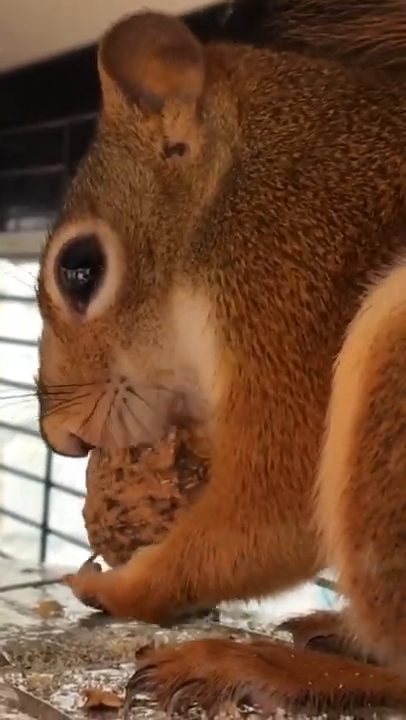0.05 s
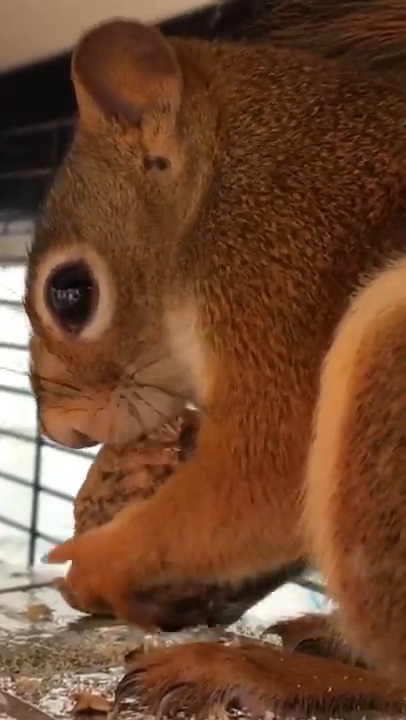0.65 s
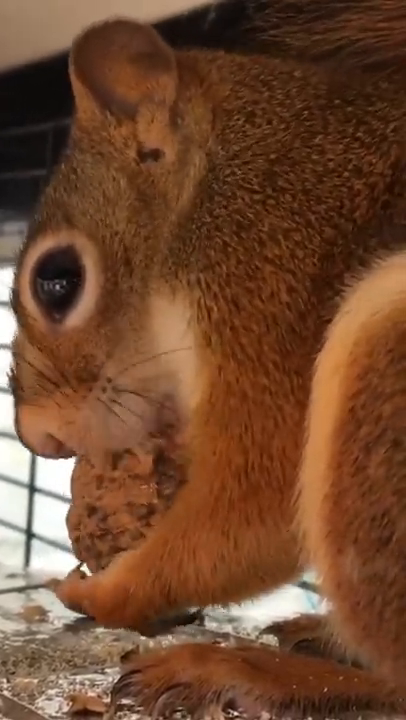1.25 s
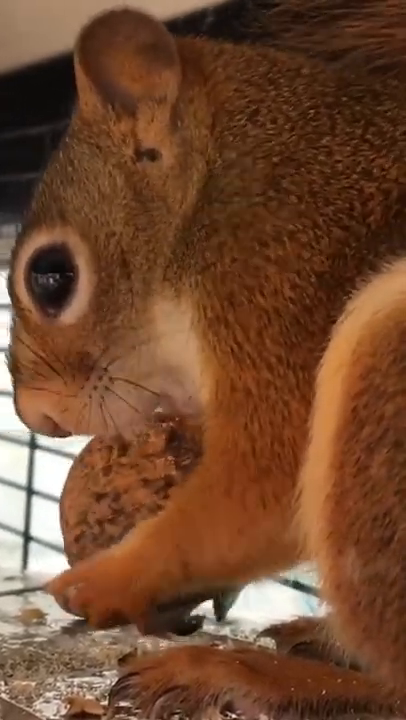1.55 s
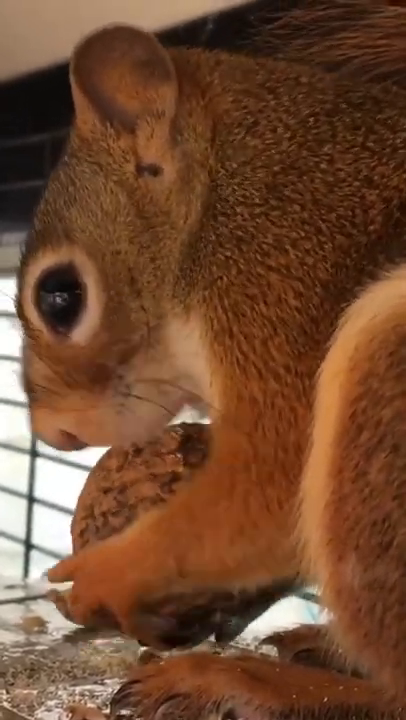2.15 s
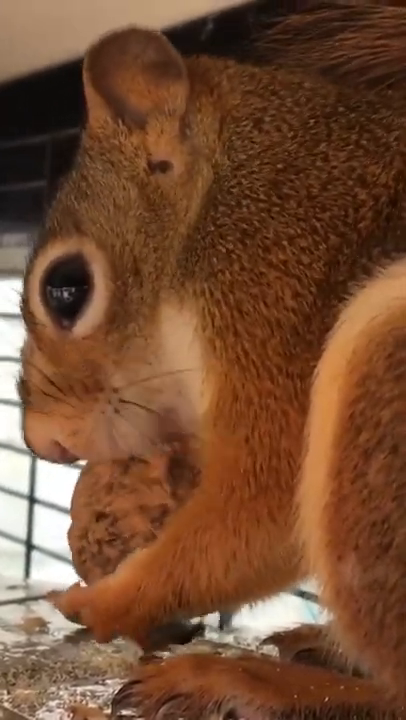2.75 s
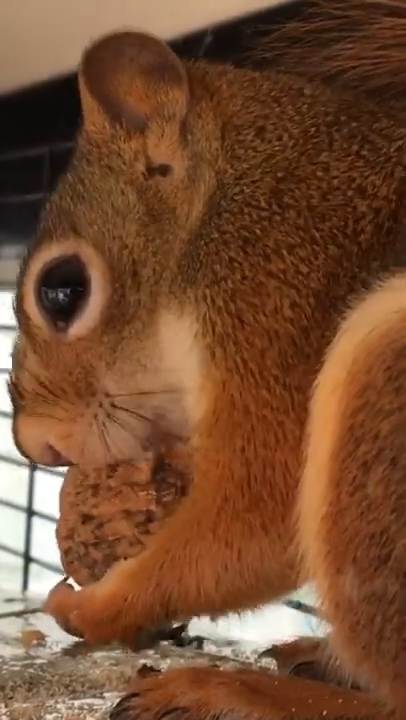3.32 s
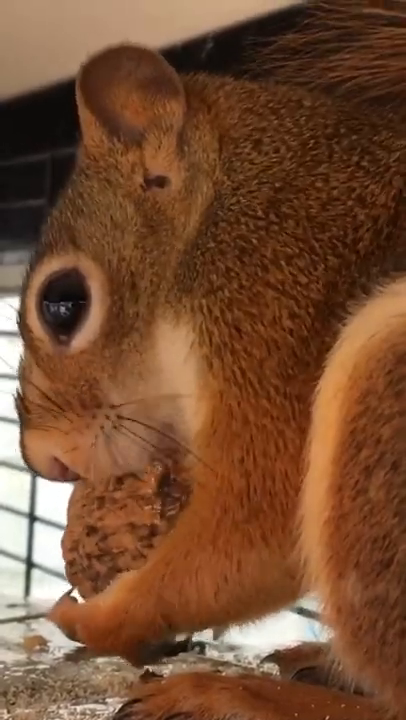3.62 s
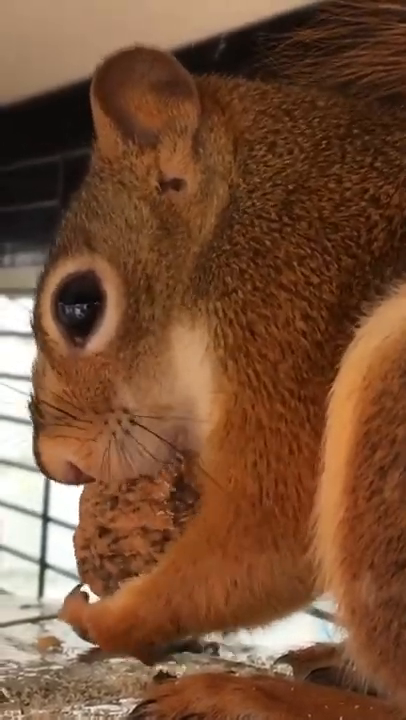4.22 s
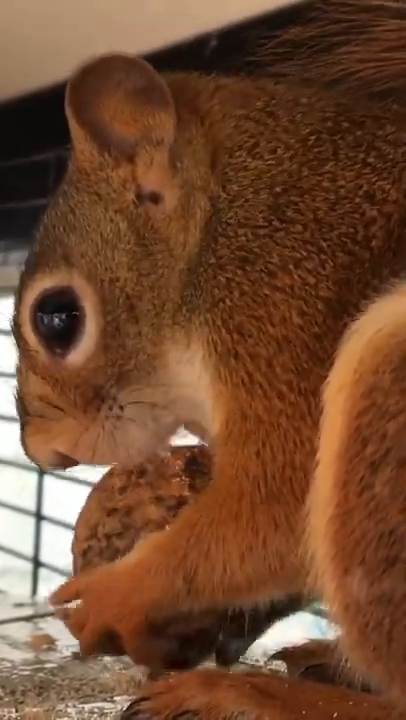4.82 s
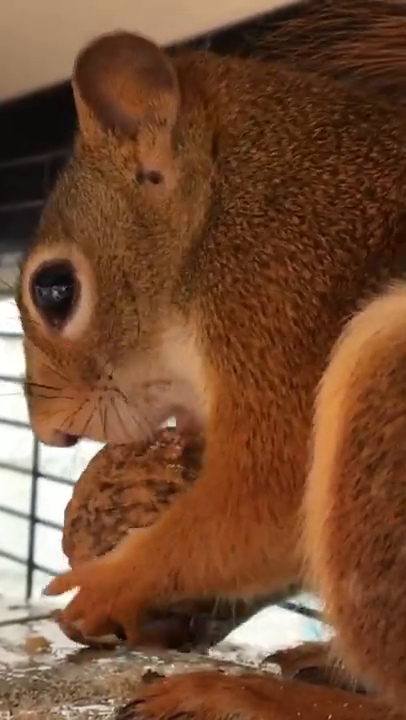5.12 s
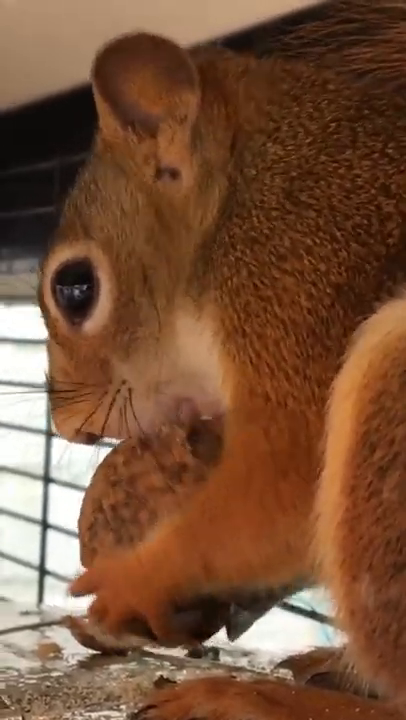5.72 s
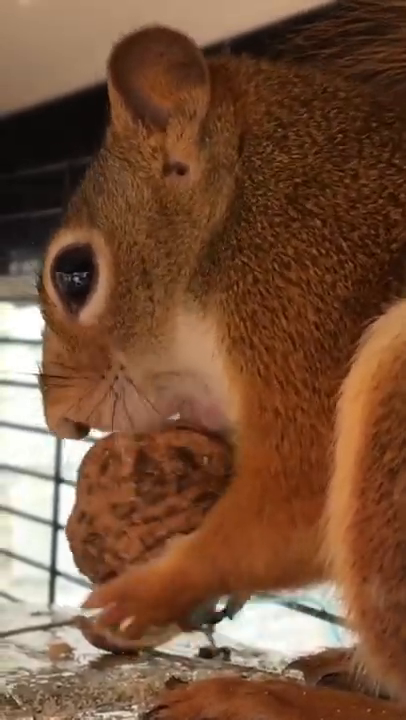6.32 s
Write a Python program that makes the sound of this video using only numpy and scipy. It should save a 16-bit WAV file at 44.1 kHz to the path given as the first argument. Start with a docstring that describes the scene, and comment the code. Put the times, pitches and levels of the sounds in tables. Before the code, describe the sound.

A squirrel's teeth rasp over a nutshell in short, uneven strokes, heard very close under a small outdoor shelter. Crisp snaps cluster among the scrapes, thin out about two thirds of the way through, and return for a last short burst. Light taps and faint claw ticks come from the nut being turned. Small birds chirp softly in the distance throughout, above a low drone like faraway traffic.

```python
"""A squirrel gnaws a hard nutshell, close up, in a wire enclosure outdoors.
Its incisors stick and slip over the shell in quick strokes and chips crack off, each setting the
shell ringing. The nut bumps, teeth tap, claws tick, and the shelter echoes it all. Some way off a
songbird repeats its chirrup, with others behind it, over open air, a low rumble and a drone."""
import sys
import numpy as np
from scipy import signal
from scipy.fft import rfft, irfft
from scipy.io import wavfile
from scipy.ndimage import uniform_filter1d

SR = 44100
rng = np.random.default_rng(int(sys.argv[2]) if len(sys.argv) > 2 else 0)


def pcm_store(signal):
    """Save signal as 16-bit PCM."""
    levels = np.round(np.clip(np.atleast_2d(signal), -1, 1) * 32767)
    wavfile.write(sys.argv[1], SR, levels.astype(np.int16).T)


N = 289296

# Strokes of the teeth. Each row: start in seconds, end in seconds, hardest point of the bite from
# 0 to 1, relative level there in dB, brightness in dB.
TOOTH_STROKES = [(.003, 0.014, 0, -25.5, -6), (0.126, 0.168, 0.26, -49, -24),
                 (0.411, 0.471, 0.15, -41.5, -9), (.574, .619, 1, -38, -15), (0.676, 0.704, 0, -35, -4),
                 (0.767, 0.807, 0.55, -40, -15), (0.808, 0.899, 0.4, -29, -7), (0.99, 1.011, 0.2, -42, -9),
                 (1.017, 1.083, 0.35, -37.5, -12.5), (1.17, 1.226, 0.04, -40, -12.5),
                 (1.346, 1.385, 0.8, -64, -14), (1.467, 1.508, 0.8, -48.5, -14.5),
                 (1.578, 1.615, 0.86, -39.5, -4.5), (1.718, 1.767, 0.6, -31, -3),
                 (1.864, 1.897, 0.05, -37.5, -2), (2.096, 2.168, 0.17, -35, -11),
                 (2.255, 2.308, 0.47, -40, -11), (2.32, 2.337, 0.4, -30.5, -7),
                 (2.436, 2.501, 0.93, -29, -8.5), (2.63, 2.675, 0.57, -28.5, -9.5),
                 (2.68, 2.738, 0, -30.5, -0.5), (2.849, 2.894, 0.05, -43.5, -15),
                 (2.917, 2.956, 0.44, -34.5, -13), (3.061, 3.097, 1, -33, -11),
                 (3.184, 3.259, 0.55, -34.5, -9), (3.353, 3.413, 0.42, -37, -12),
                 (3.398, 3.431, 0.66, -27, -5), (3.502, 3.595, 0.03, -33, -12.5),
                 (3.71, 3.786, 0.63, -30.5, -14), (3.899, 3.977, 1, -31.5, -15.5),
                 (4.094, 4.124, 0.14, -35, -15), (4.13, 4.187, 0.96, -29, -19.5),
                 (4.263, 4.31, 0.99, -43, -16), (4.328, 4.363, 0.44, -31, -18),
                 (4.42, 4.442, 0, -48.5, -14), (4.61, 4.634, 0.2, -46, -11), (4.65, 4.666, 0, -46.5, -3),
                 (4.696, 4.756, 1, -49, -8), (4.795, 4.829, 0, -43.5, -8), (4.876, 4.92, 0, -47, -12),
                 (5.111, 5.179, 0.14, -47.5, -12.5), (5.283, 5.329, 1, -36.5, -12),
                 (5.459, 5.503, 0.8, -36.5, -10), (5.588, 5.679, 0.89, -32.5, -6.5),
                 (5.758, 5.832, 0.5, -32.5, -4), (5.928, 5.946, 0.4, -32.5, 2), (6.178, 6.22, 0, -46, 6),
                 (6.303, 6.348, .3, -55, -3), (6.382, 6.397, .3, -48.5, -7.5),
                 (6.488, 6.545, 0.67, -48, -10)]

def rasp(level_db=-5, rise_db=10, ease_db=5, edge_s=0.0006, grit=0.64, skid_s=0.0024, crumb_db=16):
    """Incisors stick and slip across the shell, grit between the slips, and skid after each crumb."""
    out = np.zeros(N)
    for start, end, hardest, db, bright_db in TOOTH_STROKES:
        length = max(int((end - start + edge_s) * SR), 64)
        slips = snaps(length, per_s=470, uneven_db=3.5)
        crumbs = snaps(length, per_s=110, uneven_db=0.97)
        dust = rng.standard_normal(SR // 4)[:length]
        # a steady scrape that surges whenever a crumb snaps off
        skid = 0.47 + signal.lfilter([1], [1, -np.exp(-1 / (skid_s * SR))], abs(crumbs))
        clumps = gain_of(3 * wander(length, per_s=195.5))
        scrape = unit_rms((unit_rms(slips) + grit * dust) * skid * clumps)
        # the bite tightens up to its hardest point, then eases
        progress = np.linspace(0, 1, length)
        bite_db = np.interp(progress, [0, np.clip(hardest, .01, .99), 1], [-rise_db, 0, -ease_db])
        edges = signal.windows.tukey(length, min(2 * edge_s * SR / length, 1))
        force = gain_of(db + level_db + bite_db) * edges
        scrape_ring = shell_ring(bright_db + 1, place_db=0)
        crumb_ring = shell_ring(bright_db + 9, place_db=2.5)
        add(out, start, signal.fftconvolve(scrape * force, scrape_ring))
        add(out, start, gain_of(crumb_db) * signal.fftconvolve(crumbs * force, crumb_ring))
    return out


def snaps(length, per_s, uneven_db):
    """A run of clicks, uneven in spacing and size."""
    gaps = rng.gamma(2, .5, 256)
    sizes = np.minimum(rng.exponential(1, 256), 3)
    at = (np.cumsum(gaps) * SR / per_s).astype(int)
    clicks = gain_of(uneven_db * sizes) * rng.choice([-1, 1], len(at))
    out = np.zeros(length)
    out[at[at < length]] = clicks[at < length]
    return out


# Large chips breaking off. Each row: start in seconds, relative level in dB, brightness in dB.
CHIP_CRACKS = [(.3218, -33, -8.5), (0.664, -15, 1.5), (0.8016, -28.5, -8), (0.8111, -23.5, -5),
               (.8192, -22.5, 8), (.8287, -22.5, 3), (0.8575, -24, -5), (0.9066, -28.5, -5),
               (1.082, -26, -6), (1.0859, -23, 0), (1.2087, -33, 7), (1.6255, -29.5, 6.5),
               (2.1618, -25.5, 0), (2.3326, -29, 3), (2.3415, -18.5, -6.5), (2.491, -41, -2),
               (2.496, -32.5, -17), (2.5245, -17.5, 4), (2.7005, -24, 3), (2.726, -20, -4),
               (2.8989, -21, -5), (2.9372, -17, 3), (3.21, -25.5, -15), (3.2318, -25.5, -4),
               (3.242, -20.5, -5), (3.256, -25.5, -4), (3.2666, -18.5, 6), (3.4006, -22, -0.5),
               (3.416, -24, -6), (3.5172, -25.5, -3), (3.58, -25.5, -12), (3.6041, -21.5, -2.5),
               (3.7388, -26.5, -15), (3.761, -20.5, -9), (3.7748, -25, 8), (3.7918, -20.5, 0),
               (3.9626, -26.5, 1), (3.968, -17.5, -5), (4.1503, -18, -15.5), (4.1756, -23, 3),
               (4.203, -22, 2), (4.333, -26.5, -1), (4.345, -28, -6), (4.362, -22, -3), (5.3256, -32.5, -3),
               (5.4906, -26.5, 6), (5.6613, -20, 20), (5.8273, -22, -3)]

def chips(level_db=17, splinter=0.27, splinter_s=0.00054):
    """Each chip breaks with one snap and a very short run of splintering."""
    out, t = np.zeros(N), np.arange(256) / SR
    for start, db, bright_db in CHIP_CRACKS:
        snap = splinter * rng.standard_normal(len(t)) * np.exp(-t / splinter_s)
        snap[0] = 1
        ring = shell_ring(bright_db + 1, place_db=2)
        add(out, start, gain_of(db + level_db) * signal.fftconvolve(snap / np.linalg.norm(snap), ring))
    return out


# Broad colour of teeth on shell. Each row: frequency in Hz, relative level in dB.
SHELL_COLOUR = [(150, -43.5), (450, 0), (900, -9), (1350, 2.5), (2600, 3), (3800, 3.5), (4900, -0.5),
                (5800, 0), (7300, -3), (9600, 0), (10800, -6.5), (12400, 4.5), (13700, 1.5), (15800, -5.5)]
# Shell resonances, damped by the paws. Each row: centre in Hz, width in Hz, lift over the colour in dB.
SHELL_MODES = [(1620, 100, 2), (2025, 130, 6), (2260, 110, -5), (2555, 100, 3), (2735, 130, 4),
               (3455, 120, 6), (3940, 140, 3), (4595, 110, 6), (5350, 130, 5), (5880, 140, 4),
               (6900, 180, 5), (8030, 180, 3), (9450, 300, 3), (11330, 180, 5), (11880, 220, 5),
               (12510, 200, 5), (13070, 180, 3), (13420, 260, 4)]

def shell_ring(bright_db, place_db=0.5, lag_s=0.001837, size=4096):
    """The shell's ring after one snap, at unit energy; sharper snaps carry more treble."""
    hz = np.fft.rfftfreq(size, 1 / SR)
    tilt = spectrum_at([(1200, 0.34), (2700, 0), (4600, 0.72), (10000, 1)], hz)
    db = spectrum_at(SHELL_COLOUR, hz) + bright_db * tilt
    db += sum(lift / (1 + (2 * (hz - centre) / width) ** 2) for centre, width, lift in SHELL_MODES)
    # every place on the shell favours other resonances
    db += place_db * np.interp(hz, np.geomspace(500, 16000, 28), rng.standard_normal(28))
    # minimum phase, so the ring follows the snap
    cepstrum = irfft(np.log(gain_of(db)))
    cepstrum[1:size // 2] *= 2
    cepstrum[size // 2 + 1:] = 0
    # bending waves carry the treble faster than the bass; lag_s is the delay at 1 kHz
    bending = np.exp(-4j * np.pi * lag_s * np.sqrt(1000 * hz))
    ring = irfft(np.exp(rfft(cepstrum)) * bending)[:size // 2]
    return ring / np.linalg.norm(ring)


# Bumps and taps. Each row: start in seconds, relative level in dB, centre pitch in Hz.
BUMPS_AND_TAPS = [(.01, -44, 640), (0.324, -43, 2910), (.783, -35.5, 1210), (.991, -43, 1370),
                  (2.285, -39.5, 570), (4.259, -42, 1430), (4.355, -41, 660), (4.652, -43.5, 1127),
                  (4.811, -38.5, 2740), (5.493, -39.5, 1360), (5.934, -40, 556), (6.185, -40.5, 1270),
                  (6.245, -41, 567), (6.311, -44.5, 2360), (6.391, -44, 555), (6.496, -47.5, 3080)]

def bumps_and_taps(level_db=-3, ring_s=0.0033, spread=0.26, modes=14):
    """Dull bumps of the nut and a few higher, soft squeaky taps of the teeth: close, damped modes."""
    out, t = np.zeros(N), np.arange(2048) / SR
    for start, db, hz in BUMPS_AND_TAPS:
        mode_hz = hz * np.exp(spread * rng.standard_normal((modes, 1)))
        cluster = np.sin(2 * np.pi * (mode_hz * t + rng.random((modes, 1)))).sum(0)
        hit = cluster * (t / ring_s) * np.exp(-2 * t / ring_s)
        loudest = np.sqrt(uniform_filter1d(hit ** 2, size=200).max())
        add(out, start, gain_of(db + level_db) * hit / loudest)
    return out


# How busily the paws turn the nut. Each row: time in seconds, relative level in dB.
PAW_ACTIVITY = [(0, 2), (4.4, -1), (4.8, 5), (5.1, 0), (5.9, 2.5), (6.25, 6), (6.56, -10.5)]

def claws(level_db=-70, ticks_per_s=70, uneven_db=4):
    """Claws tick faintly on the nut, louder while it is turned over."""
    touches = rng.random(N) < ticks_per_s / SR
    sizes = gain_of(uneven_db * np.minimum(rng.exponential(1, N), 3))
    ticks = unit_rms(touches * sizes) * gain_of(level_db + curve(PAW_ACTIVITY))
    return signal.fftconvolve(ticks, shell_ring(bright_db=-15))[:N]


def shelter(x, near_db=-5, far_db=-14.5, shifts_per_s=9, patterns=4):
    """The ledge and the animal's body answer at once, the roof and walls a little later."""
    out, t = x.copy(), np.arange(N) / SR
    for k in range(patterns):
        # several echo patterns crossfade in turn, so the echoes add no fixed ring to the shell's own
        away = np.abs((t * shifts_per_s - k + patterns / 2) % patterns - patterns / 2)
        part = x * np.cos(np.pi / 2 * np.minimum(away, 1))
        near = echoes(delay_s=.0015, t60=.034, treble_t60=.028)
        far = echoes(delay_s=.008, t60=0.18, treble_t60=0.084)
        out += gain_of(near_db) * signal.oaconvolve(part, near)[:N]
        out += gain_of(far_db) * signal.oaconvolve(part, far)[:N]
    return out


# The bird's repeated call. Each row: start in seconds, relative level in dB.
CHIRRUP_CALLS = [(0.141, -50), (0.517, -50.5), (1.084, -57), (1.14, -77), (1.776, -53.5), (2.161, -49.5),
                 (2.505, -51.5), (2.849, -55), (3.664, -57), (4.11, -54), (4.432, -55.5), (4.868, -53),
                 (5.288, -52), (5.728, -49)]
# Single cheeps. Each row: start in seconds, length in seconds, top pitch in Hz, relative level in dB.
CHEEP_CALLS = [(0, 0.12, 3830, -58), (1.109, .09, 5740, -52), (1.517, 0.16, 5400, -63),
               (1.808, 0.092, 3660, -57.5), (1.904, 0.11, 5500, -61), (2.024, 0.11, 5900, -60),
               (2.372, 0.068, 4970, -58), (3.258, 0.15, 4560, -56), (3.603, 0.11, 4540, -57),
               (4.695, 0.082, 5380, -54.5), (4.78, 0.059, 3610, -52), (4.943, 0.067, 3800, -55),
               (5.634, 0.073, 5120, -48), (6.013, .05, 4650, -55), (6.056, .066, 5710, -45),
               (6.115, .052, 5520, -47), (6.164, 0.044, 4920, -48.5)]

def songbird(direct_db=-4, wet_db=-6.5, husk_db=-5.5, husk_hz=4050, husk_width_hz=750):
    """Quick whistled arches with a husky edge, blurred by the surroundings."""
    song, effort = np.zeros(N), np.zeros(N)
    calls = [chirrup(*row) for row in CHIRRUP_CALLS] + [cheep(*row) for row in CHEEP_CALLS]
    for start, hz, db in calls:
        tone, swell = whistle(hz, db)
        add(song, start, tone)
        # the husk is capped, so the louder notes are the purer ones
        add(effort, start, np.minimum(swell, gain_of(-57.5)))
    band = np.exp(-.5 * ((np.fft.rfftfreq(N, 1 / SR) - husk_hz) / husk_width_hz) ** 2)
    husk = gain_of(husk_db) * effort * coloured_noise(band)
    wet = signal.fftconvolve(song + 2 * husk, echoes(delay_s=.008, t60=.34, treble_t60=.3))[:N]
    return gain_of(direct_db) * (song + husk) + gain_of(wet_db) * wet


# The chirrup's contour. Each row: time into the call in seconds, pitch in Hz, relative level in dB.
CHIRRUP_SHAPE = [(0, 3430, 3), (.028, 5000, -3), (.045, 5390, 2.5), (.066, 4220, -10), (0.094, 3640, -2),
                 (.125, 4660, -1.5), (.15, 5000, 0.5), (.185, 4550, -11.5)]

def chirrup(start, db):
    """Start, pitch and level of a two-part call: a high arch, a dip and a lower arch."""
    when, hz, shape_db = np.transpose(CHIRRUP_SHAPE)
    t = np.arange(0, when[-1], 1 / SR)
    glide_hz = uniform_filter1d(np.interp(t, when, hz), size=500)
    return start, glide_hz, db + np.interp(t, when, shape_db)


def cheep(start, length_s, top_hz, db, sag=.4):
    """Start, pitch and level of one arch, whose ends sag by a share of its top pitch."""
    return start, top_hz * (1 - sag * np.linspace(-1, 1, int(length_s * SR)) ** 2), db


def whistle(hz, db, waver=0.028, flutter_db=4):
    """A bird's fluttering tone along a pitch curve, and its envelope."""
    hz = hz * (1 + waver * wander(len(hz), per_s=697))
    swell = gain_of(db + flutter_db * wander(len(hz), per_s=188)) * signal.windows.tukey(len(hz), .12)
    return swell * np.sqrt(2) * np.sin(2 * np.pi * np.cumsum(hz) / SR), swell


def far_birds(level_db=-68, length_s=0.068, low_hz=3500, high_hz=5500, count=70):
    """More birds cheep at random farther off, heard only through their echoes."""
    song = np.zeros(N)
    for k, (when, pitch) in enumerate(rng.random((count, 2))):
        top_hz = low_hz + pitch * (high_hz - low_hz)
        start, hz, db = cheep((k + when) / count * N / SR, length_s, top_hz, level_db)
        add(song, start, whistle(hz, db, waver=.04)[0])
    return signal.fftconvolve(song, echoes(delay_s=0.003, t60=.45, treble_t60=0.59))[:N]


# Colour of the outdoor bed. Each row: frequency in Hz, relative level in dB.
AIR_COLOUR = [(20, -43.5), (40, 3.5), (80, 1.5), (135, -3), (200, -8.5), (310, -12.5), (430, -9.5),
              (600, -15), (800, -22), (1500, -28), (4000, -40.5), (6500, -39.5), (11000, -44), (16000, -47)]
# The open air lulls for a moment. Each row: time in seconds, relative level in dB.
AIR_LULL = [(0, 0), (1.1, 0), (2.05, 2), (2.55, -3), (3.2, -1), (6.56, 1)]
# Swells of the rumble. Each row: time in seconds, relative level in dB.
RUMBLE_SWELLS = [(0, -46.5), (.95, -46), (1.08, -48.5), (1.6, -48), (1.8, -46.5), (2.4, -55), (3.3, -48),
                 (4.3, -47), (4.9, -45), (5.06, -37.5), (5.17, -49.5), (5.26, -42.5), (6.1, -41),
                 (6.25, -47), (6.48, -37)]

def outdoors(air_db=-46.5, rumble_db=-2, split_hz=190, swell_db=2.43, lump_db=0.5):
    """A wash of open air, with a swelling rumble and the drone under it."""
    hz = np.fft.rfftfreq(N, 1 / SR)
    air = coloured_noise(gain_of(spectrum_at(AIR_COLOUR, hz)))
    low = irfft(rfft(air) / (1 + (hz / split_hz) ** 6), N)
    wash = (air - low) * gain_of(air_db + curve(AIR_LULL) + swell_db * wander(N, per_s=5))
    tones = drone()
    rumble = unit_rms(low) * gain_of(curve(RUMBLE_SWELLS) + rumble_db + lump_db * wander(N, per_s=9))
    return wash + rumble + tones


# Rise and fall of the drone. Each row: time in seconds, level in dB.
DRONE_SWELLS = [(0, -52), (1.4, -82), (2.4, -54.5), (3.5, -58), (3.85, -47), (4.3, -52.5), (4.65, -43.5),
                (5, -48), (6.56, -59.5)]

def drone(hz=81.6, waver=0.023, hum_start_s=1.15, hum_length_s=0.42, hum_hz=158, hum_db=-52.5):
    """A low wavering tone like distant traffic, with one brief hum above it."""
    phase_per_hz = 2 * np.pi * np.cumsum(1 + waver * wander(N, per_s=25)) / SR
    tone = np.sin(hz * phase_per_hz) * gain_of(curve(DRONE_SWELLS))
    swell = signal.windows.tukey(int(hum_length_s * SR), .3)
    add(tone, hum_start_s, gain_of(hum_db) * swell * np.sin(hum_hz * phase_per_hz[:len(swell)]))
    return np.sqrt(2) * tone


def echoes(delay_s, t60, treble_t60):
    """A scattered tail of unit energy, falling 60 dB in t60 seconds; the treble has its own decay."""
    hz, t, scatter = signal.stft(rng.choice([-1., 1.], SR // 2), SR, nperseg=128)
    decay_s = spectrum_at([(2000, t60), (12000, treble_t60)], hz)[:, None]
    tail = signal.istft(scatter * gain_of(-60 * t / decay_s), SR, nperseg=128)[1]
    return np.r_[np.zeros(int(delay_s * SR)), tail / np.linalg.norm(tail)]


def gain_of(db):
    """Decibels to amplitude."""
    return 10 ** (np.asarray(db) / 20)


def unit_rms(x):
    """Scales to rms 1."""
    return x / np.sqrt(np.mean(x ** 2) + 1e-20)


def coloured_noise(gains):
    """Noise shaped by one gain a frequency, at rms 1."""
    return unit_rms(irfft(rfft(rng.standard_normal(N)) * gains, N))


def spectrum_at(points, hz):
    """Joins (Hz, value) rows on a log-frequency axis."""
    point_hz, value = np.transpose(points)
    return np.interp(np.log(hz + 1), np.log(point_hz + 1), value)


def curve(rows):
    """Joins (seconds, value) rows by straight lines."""
    return np.interp(np.arange(N) / SR, *np.transpose(rows))


def add(mix, start, sound):
    """Mixes a sound in at a start time in seconds."""
    part = mix[max(round(start * SR), 0):][:len(sound)]
    part += sound[:len(part)]


def wander(length, per_s):
    """A random drift of about unit size, with per_s new targets a second."""
    knots = np.arange(length) / SR * per_s
    return np.interp(knots, np.arange(4096), rng.standard_normal(4096))


def scene():
    """The gnawing under its shelter, the birds and the open air, in mono."""
    gnawing = rasp() + chips() + bumps_and_taps() + claws()
    return (shelter(gnawing) + songbird() + far_birds() + outdoors())[None]


def record(dry):
    """A steep low-pass takes off the very top of the treble."""
    low_pass = signal.firwin(255, cutoff=15950, window=("kaiser", 8), fs=SR)
    return signal.oaconvolve(dry, low_pass[None], "same")


dry = scene()
out = record(dry)
pcm_store(out)
```